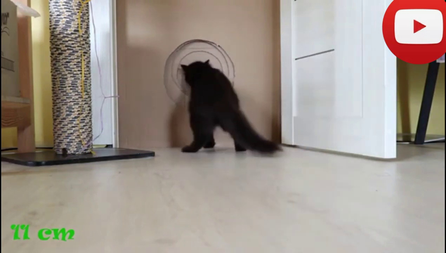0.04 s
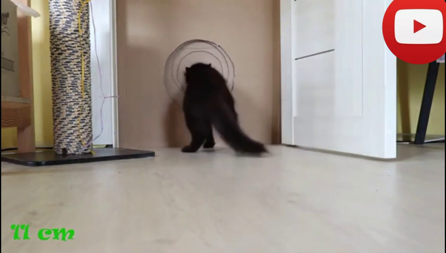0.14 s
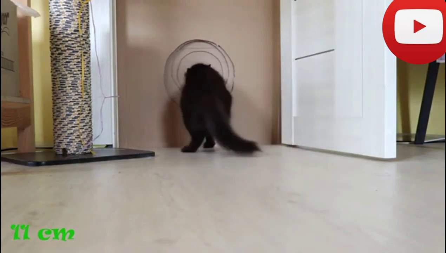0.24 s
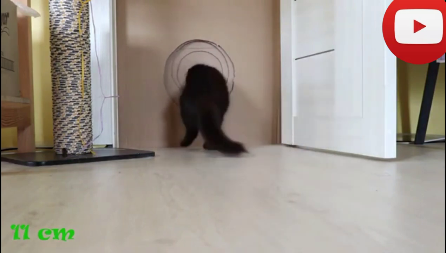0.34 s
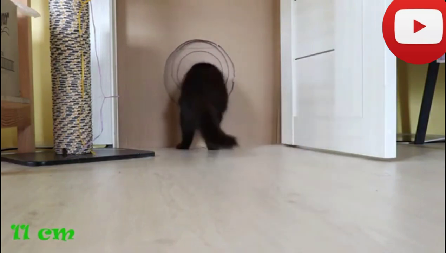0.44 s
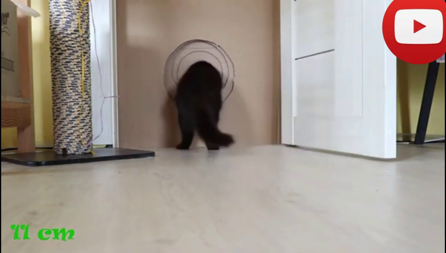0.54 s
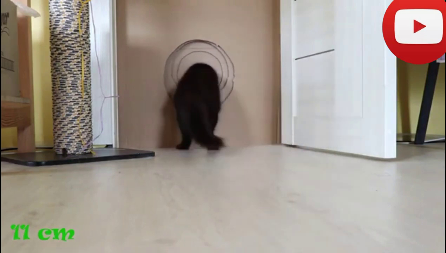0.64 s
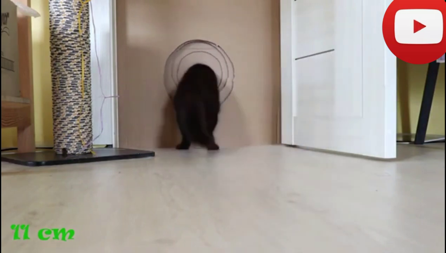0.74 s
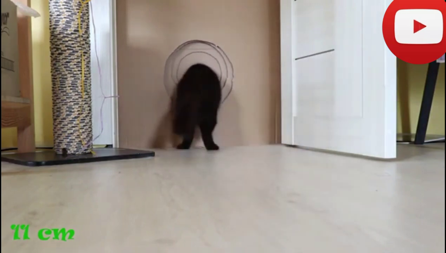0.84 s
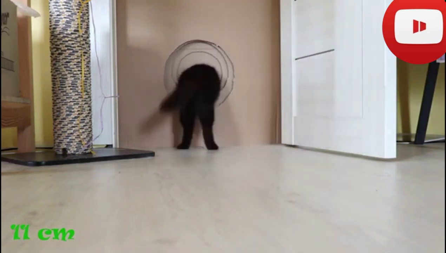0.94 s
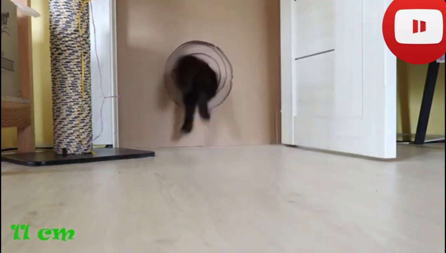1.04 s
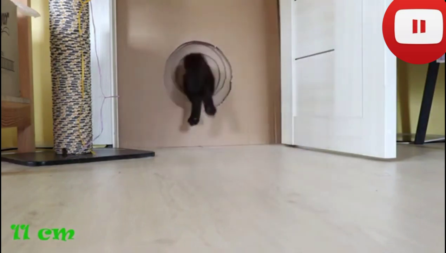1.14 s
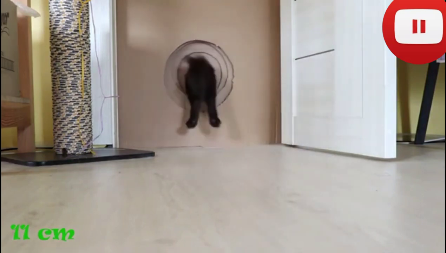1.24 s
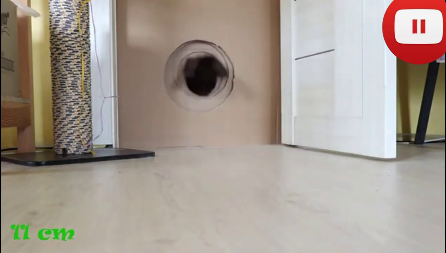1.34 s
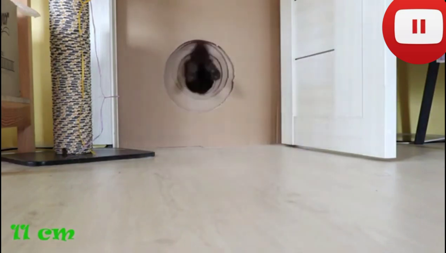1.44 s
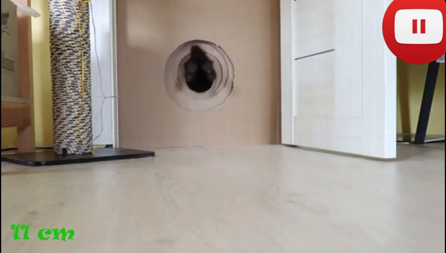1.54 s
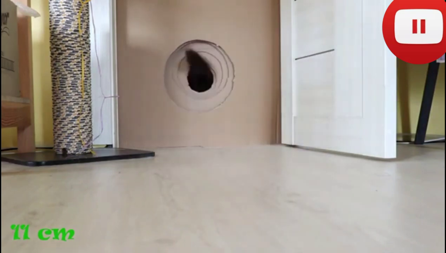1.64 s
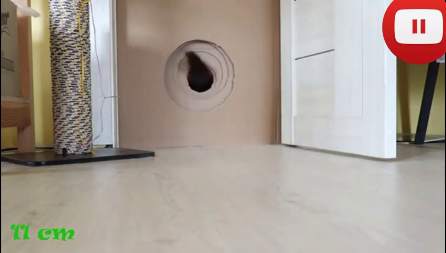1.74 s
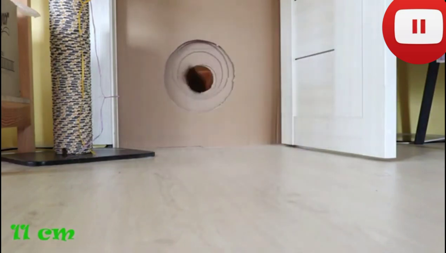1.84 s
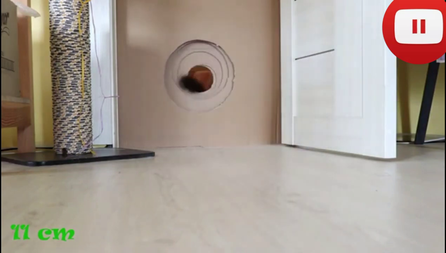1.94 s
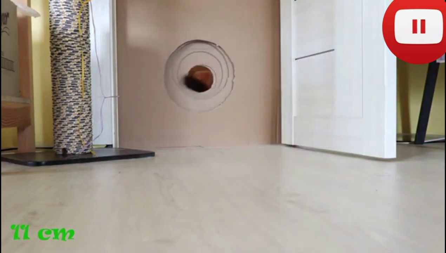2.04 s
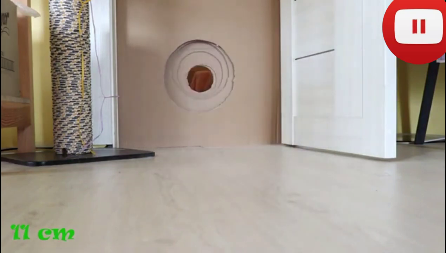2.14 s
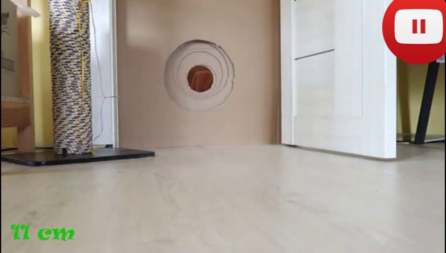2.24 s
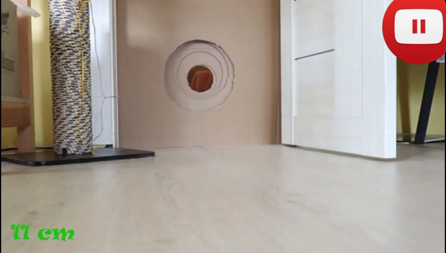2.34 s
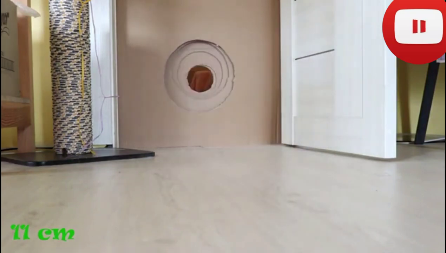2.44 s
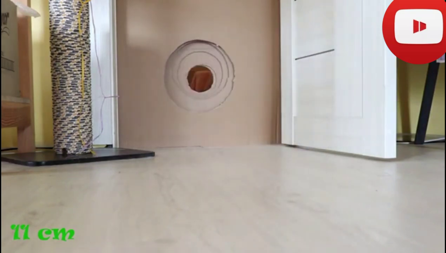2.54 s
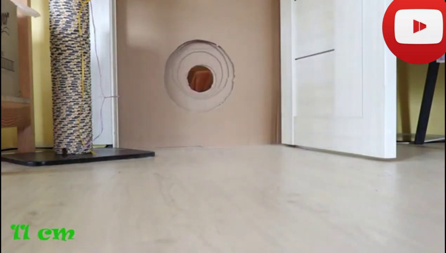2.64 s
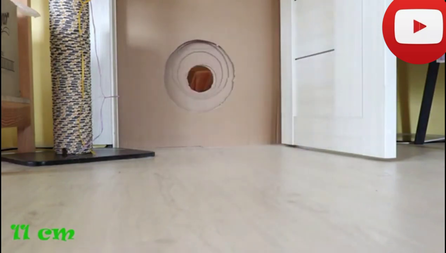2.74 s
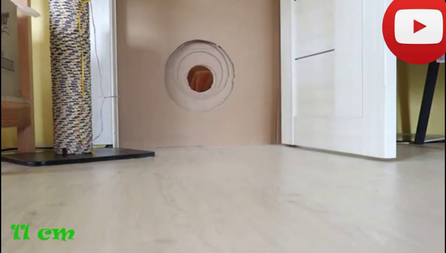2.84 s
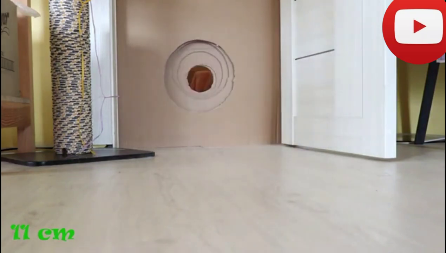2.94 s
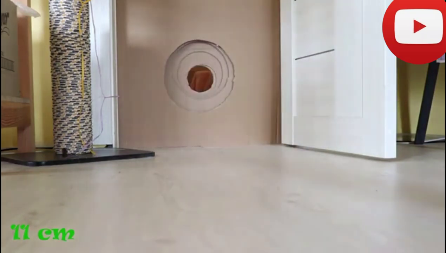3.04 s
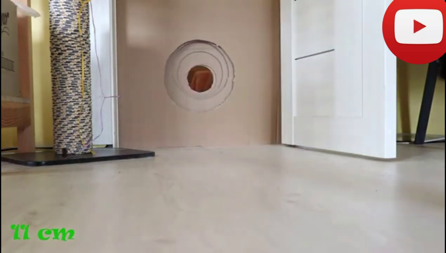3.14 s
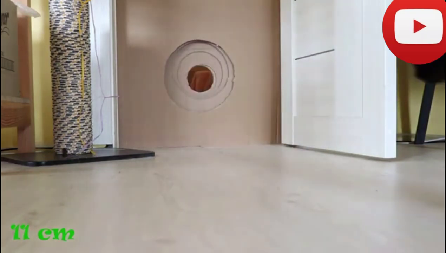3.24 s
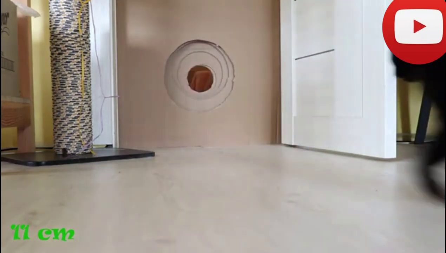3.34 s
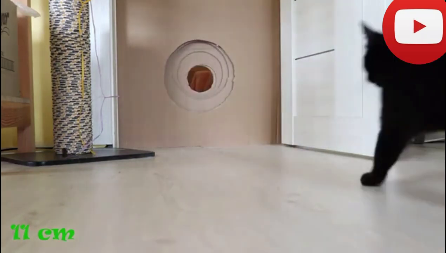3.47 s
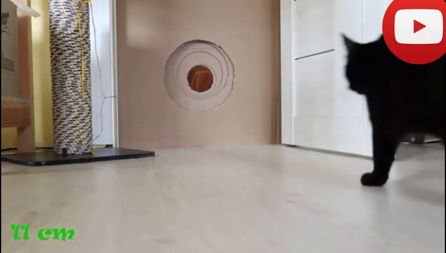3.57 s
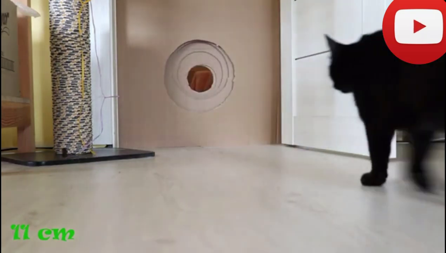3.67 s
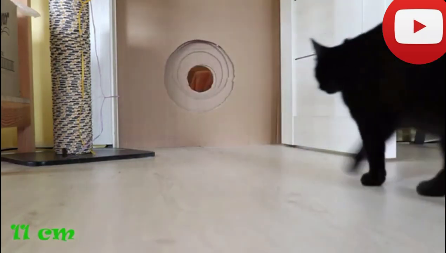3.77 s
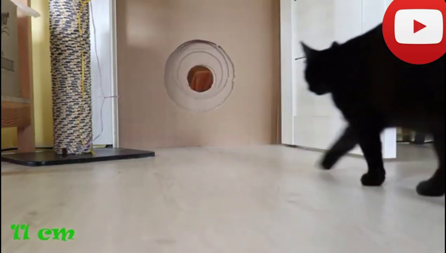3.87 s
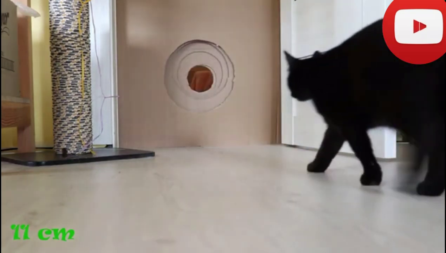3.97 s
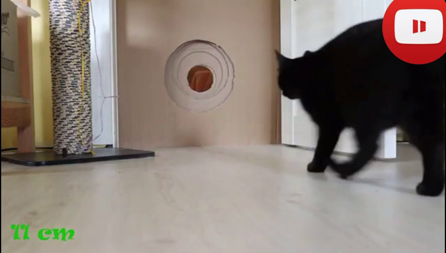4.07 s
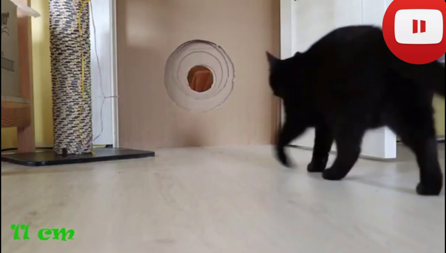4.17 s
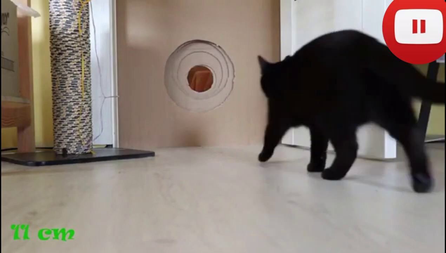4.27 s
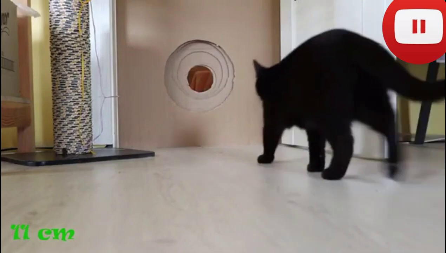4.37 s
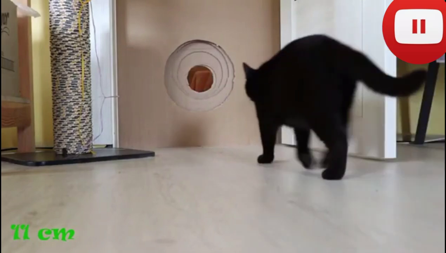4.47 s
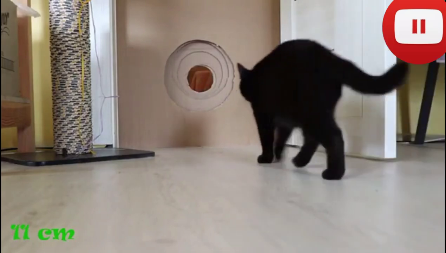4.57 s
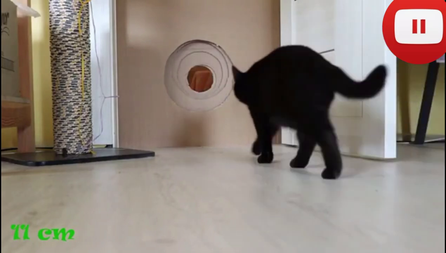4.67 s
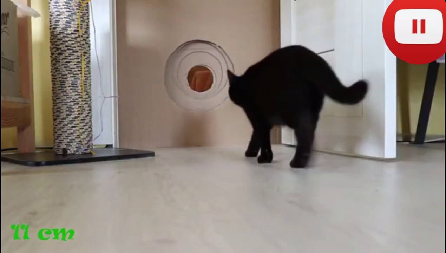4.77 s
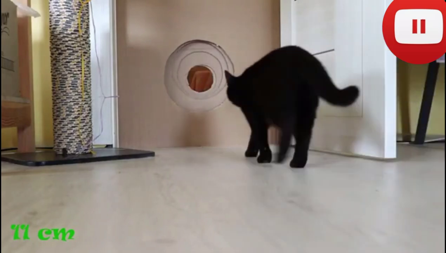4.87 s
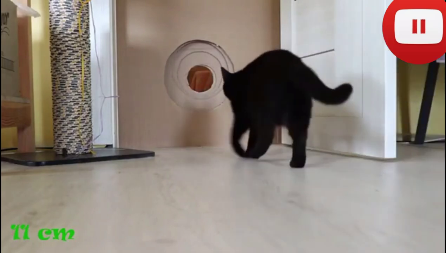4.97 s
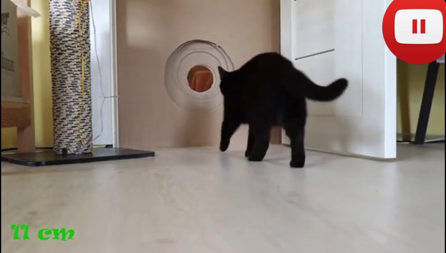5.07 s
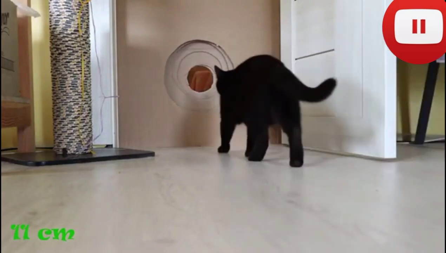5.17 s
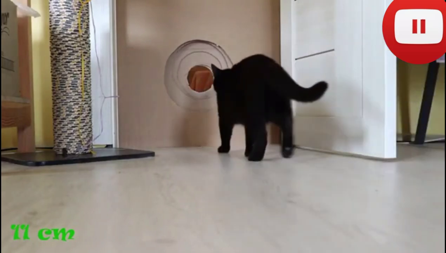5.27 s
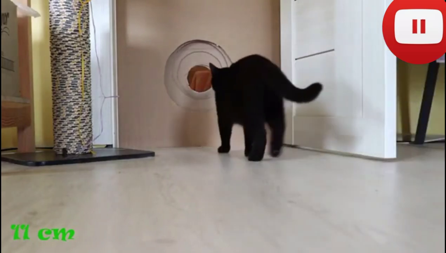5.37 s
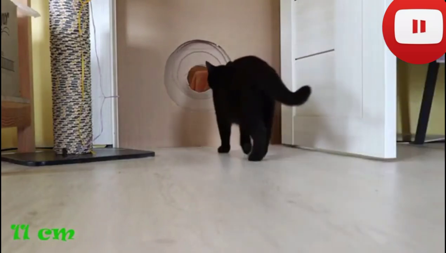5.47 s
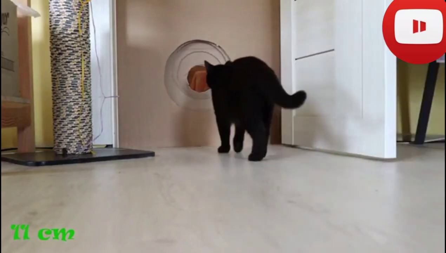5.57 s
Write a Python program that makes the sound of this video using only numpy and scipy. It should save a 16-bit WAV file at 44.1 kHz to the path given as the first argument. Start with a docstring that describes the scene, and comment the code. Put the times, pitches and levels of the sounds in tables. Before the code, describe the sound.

Faint fur brushes swell into a loud, thumping scrape against a cardboard sheet, followed by a cat's soft steps indoors.

```python
"""Faint brushes of fur over a low room rumble swell into rasps and thumps: a cat squeezes through a round
hole in a cardboard sheet set in a doorway, then pads back across a laminate floor with soft swishes.
Sliding friction on the rim makes the hiss, and stick-slip makes one creak. Knocks excite the sheet's
normal modes; shoves set off its slowest swing. A few tiny pings sound, and the hallway reverberates.
The loudest heaves overload a phone lying on the floor."""
import sys
import numpy as np
from scipy import signal
from scipy.fft import rfft, irfft
from scipy.io import wavfile
from scipy.ndimage import uniform_filter1d

SR = 44100
rng = np.random.default_rng(int(sys.argv[2]) if len(sys.argv) > 2 else 0)


def file_out(sig):
    """Save sig as 16-bit WAV at sys.argv[1]."""
    # one column per channel
    cols = np.atleast_2d(sig).T
    # limit, then scale
    lim = np.clip(cols, -1, 1)
    pcm = np.round(lim * 32767).astype(np.int16)
    wavfile.write(sys.argv[1], SR, pcm)


N = 247401
TIME = np.arange(N) / SR
HZ = np.maximum(np.arange(N // 2 + 1) * SR / N, 1)


def undb(db):
    """Amplitude ratio of a level in decibels."""
    return 10 ** (np.asarray(db) / 20)

def decay(t, t60):
    """Exponential damping: 60 dB down after t60 seconds."""
    return np.exp(-np.log(1000) * t / t60)

def along_hz(points):
    """Interpolation on a logarithmic frequency axis."""
    hz, value = np.transpose(points)
    return np.interp(np.log(HZ), np.log(hz), value)

def along_time(rows):
    """Interpolation of each level column in time; -120 dB outside the rows."""
    times, *columns = np.transpose(rows)
    return [np.interp(TIME, times, column, left=-120, right=-120) for column in columns]

def add(out, start_s, piece):
    """Superposition of a piece from start_s on."""
    i = int(start_s * SR)
    out[..., i:i + piece.shape[-1]] += piece[..., :N - i]

def band(x, lo_hz, hi_hz, order=2):
    """Band-pass filtering, scaled so that the mean of the channels has rms 1."""
    out = signal.sosfilt(signal.butter(order, [lo_hz, hi_hz], "band", fs=SR, output="sos"), x)
    return out / np.atleast_2d(out).mean(axis=0).std()

def flicker(rate_hz):
    """Random modulation: held values, smoothed twice, with a spread near 1."""
    hold = int(SR / rate_hz)
    steps = np.repeat(rng.standard_normal(N // hold + 1), hold)
    return 1.16 * uniform_filter1d(uniform_filter1d(steps, hold), hold)[:N]

def grains(scatter_db):
    """Heavy-tailed noise: many tiny slips and some strong ones."""
    return rng.standard_normal(N) * undb(scatter_db * rng.exponential(size=N))

# Left-right likeness of friction noise, high in the bass: frequency_hz, correlation
FRICTION_COHERENCE = [(50, 1), (300, 0.93), (700, 0.82), (1300, 0.67), (2600, 0.93), (4000, 0.34),
                      (6000, 0.16), (9000, 0.16), (14000, 0.065)]
def stereo_noise(spectrum, scatter_db, coherence=FRICTION_COHERENCE):
    """Partial coherence: shared and opposed grains add to coloured stereo noise of rms 1."""
    correlation = np.clip(along_hz(coherence), -1, 1)
    mid = rfft(grains(scatter_db)) * np.sqrt(1 + correlation)
    side = rfft(grains(scatter_db)) * np.sqrt(1 - correlation)
    out = irfft(undb(along_hz(spectrum)) * np.array([mid + side, mid - side]), N)
    return out / out.std()

# Spectrum of the room's background: frequency_hz, density_db
ROOM_SPECTRUM = [(12, -10), (20, -0.5), (40, -13.5), (100, -14), (160, -11.5), (200, -15.5), (370, -17),
                 (700, -26.5), (1300, -32.5), (2600, -39), (6000, -38), (8500, -40), (12000, -42.5),
                 (14500, -42), (15500, -51)]
# Its left-right likeness: frequency_hz, correlation
ROOM_COHERENCE = [(50, 0.33), (400, 0.78), (900, 0.55), (2500, 0.36), (5000, 0.61), (8000, .3),
                  (14000, .15)]
def room_tone(level_db=-48):
    """Ambient noise: a broadband floor, strongest in the bass, whose level drifts slightly."""
    return undb(level_db + 0.75 * flicker(4.3)) * stereo_noise(ROOM_SPECTRUM, .3, ROOM_COHERENCE)

def hallway(source, t60_s=0.63, level_db=-13.5):
    """Reverberation: convolution with a short dull wash, partly different in each channel."""
    t = TIME[:SR // 2]
    common, apart = band(rng.standard_normal((2, len(t))), 90, 8200) * decay(t, t60_s) * (t > .004)
    response = np.array([common + 0.24 * apart, common - 0.49 * apart]) / np.sqrt((common ** 2).sum())
    return undb(level_db) * signal.fftconvolve(source[None], response, axes=1)[:, :N]

# Tiny pings: centre_s, pitch_hz, peak_db, length_s
PINGS = [(.041, 1480, -39.5, 0.0066), (0.274, 8300, -45, 0.022), (0.844, 1417, -53, 0.033),
         (2.416, 1410, -52, 0.017), (2.474, 1384, -46, 0.012), (2.632, 1305, -51, 0.017)]
def pings():
    """Tone bursts: a Gaussian envelope gives each pure blip soft edges."""
    out = np.zeros(N)
    for centre_s, pitch_hz, peak_db, length_s in PINGS:
        envelope = undb(peak_db) * np.exp(-(2 * (TIME - centre_s) / length_s) ** 2)
        out += envelope * np.sin(2 * np.pi * pitch_hz * TIME)
    return out

def tufts(noise, depth_db):
    """Independent modulation: tufts catch at different moments, so each third-octave flickers alone."""
    out = 0
    for hz in 1100 * 2 ** np.arange(0, 4, 1 / 3):
        third = signal.butter(1, [hz, hz * 2 ** (1 / 3)], "band", fs=SR, output="sos")
        out = out + signal.sosfilt(third, noise) * undb(depth_db * flicker(35))
    return out

# Spectrum of the board shaken by rubbing: frequency_hz, density_db
BOARD_SPECTRUM = [(47, -36), (80, -5.5), (151, -2.5), (310, -8.5), (396, -4.5), (464, -7.5), (627, -9.5),
                  (735, -8.5), (2500, -20), (3250, -43), (5500, -120)]
def rubbing(spectrum, hiss_db, board_db, air_db, scatter_db, judder_db):
    """Sliding friction: slips of hair make hiss, an airy top and dull board noise that judder together."""
    hair = tufts(stereo_noise(spectrum, scatter_db), 2 * judder_db)
    hiss = band(hair, 1500, 8200, order=1)
    air = band(hair, 6460, 17000) * undb(air_db)
    board = stereo_noise(BOARD_SPECTRUM, 1.9) * undb(board_db + judder_db * flicker(30))
    return undb(hiss_db + judder_db * flicker(110)) * (hiss + air + board)

def strokes(rows):
    """Exponential envelopes, 20 dB per rise or fade time; the loudest stroke sets level and colour."""
    peak_s, hiss_db, rise_s, fade_s, *colours = np.transpose(rows)[:, :, None]
    envelopes_db = hiss_db - 20 * np.maximum((peak_s - TIME) / rise_s, (TIME - peak_s) / fade_s)
    loudest = envelopes_db.argmax(axis=0)
    return [envelopes_db.max(axis=0)] + [uniform_filter1d(db[loudest, 0], SR // 50) for db in colours]

# Spectrum of paw friction: frequency_hz, density_db
PAW_SPECTRUM = [(880, -1), (1500, -5), (3330, -3), (4680, -3.5), (8630, -6.5), (13000, -13.5), (15300, -19)]
# Swishes of the walk: peak_s, hiss_db, rise_s, fade_s, board_share_db, air_share_db
SWISHES = [(3.41, -52, 0.33, 0.18, -2, -8), (3.63, -54.5, 0.044, 0.34, -19, 0.5),
           (3.71, -48.5, .15, 0.19, -16, -6.5), (3.91, -51.5, 0.096, 0.42, -4.5, -10),
           (4.05, -57, 0.26, .15, 0, -4), (4.55, -46.5, 0.12, 0.26, -4, -6),
           (4.66, -50, 0.079, 0.4, 6, -13), (5.05, -59, .12, 0.23, -8, -4), (5.19, -57, 0.033, .2, 5, -8),
           (5.31, -45, 0.045, 0.46, -2.5, -7), (5.38, -49, .1, 0.31, 6.5, -6), (5.6, -54, 0.24, .2, -2, -6)]
def paw_swishes():
    """Light friction: soft, fine-grained strokes as the cat walks."""
    return rubbing(PAW_SPECTRUM, *strokes(SWISHES), scatter_db=0.4, judder_db=1.4)

# Envelope of the creak: time_s, level_db
CREAK_LEVELS = [(1.345, -32), (1.36, -8.5), (1.37, -16.5), (1.376, -1), (1.397, 3.5), (1.403, -10.5),
                (1.415, -6.5), (1.44, -19.5), (1.5, -28)]
def creak(pitch_hz=412.6):
    """Stick-slip oscillation: the rim drives one mode of the sheet, wavering, with grit at each slip."""
    level_db, = along_time(CREAK_LEVELS)
    phase = 2 * np.pi * np.cumsum(pitch_hz * (1 + 0.0099 * flicker(150))) / SR
    tone = np.sin(phase) + 0.11 * np.sin(2 * phase)
    grit = 0.11 * band(rng.standard_normal(N), 220, 1100) * (1 + np.sin(phase))
    return undb(level_db + 0.86 * flicker(120)) * (tone + grit)

# Spectrum of fur on cardboard: frequency_hz, density_db
FUR_SPECTRUM = [(710, -29.5), (1200, 0), (1760, -4.5), (1860, -8), (2070, -4.5), (2250, -6), (3000, -3),
                (4900, -5), (8340, -4.5), (10700, -8.5), (11900, -6), (13600, -11), (15300, -19)]
# The body drags through the rim: time_s, hiss_db
DRAG_LEVELS = [(.8, -55), (.865, -42), (.97, -43), (1.04, -50), (1.085, -40.5), (1.29, -33.5),
               (1.385, -24.5), (1.42, -34), (1.46, -30.5), (1.52, -22), (1.53, -10.5), (1.548, -8),
               (1.558, -23.5), (1.578, -9.5), (1.6, -13.5), (1.615, -10.5), (1.64, -12), (1.71, -16),
               (1.78, -26.5), (1.8, -45), (1.82, -33), (1.875, -24), (1.94, -38.5), (2.02, -35),
               (2.07, -42), (2.2, -39), (2.26, -46.5), (2.34, -62)]
# Colour of the drag relative to its hiss: time_s, board_share_db, air_share_db
DRAG_COLOUR = [(.8, -2, 0.5), (.97, -7.5, -5.5), (1.1, 1.5, -4), (1.2, -2, 0), (1.27, 0.5, -2),
               (1.39, 9, 0), (1.5, -1.5, -3), (1.56, 4, -3), (1.65, 2, -8), (1.8, 6.5, -7.5),
               (1.95, 0.5, -1.5), (2.15, 0.5, -2.5), (2.34, 6.5, -6)]
# Head and tail brush the rim: peak_s, hiss_db, rise_s, fade_s, board_share_db, air_share_db
BRUSHES = [(.14, -50, 0.15, 0.39, -7.5, -7), (.27, -44.5, 0.1, 0.29, -4.5, -3),
           (.33, -44, .1, 0.21, -3, -5), (.415, -43.5, 0.062, 0.11, 9.5, -7.5),
           (.6, -54, 0.26, 0.41, 0.5, -2), (.72, -48, 0.2, .15, -4, -1),
           (2.405, -46.5, 0.12, .25, -11, -2.5), (2.48, -48, .15, 0.13, -3.5, 2),
           (2.63, -47.5, 0.11, 0.074, -17.5, 0.5)]
def fur_on_rim():
    """Coarse friction: the long drag or a light brush, whichever is louder, sets level and colour."""
    drag = along_time(DRAG_LEVELS) + along_time(DRAG_COLOUR)
    brush = strokes(BRUSHES)
    hiss_db, board_db, air_db = np.where(drag[0] > brush[0], drag, brush)
    return rubbing(FUR_SPECTRUM, hiss_db, board_db, air_db, scatter_db=2.0, judder_db=1.42)

# Claws and sudden slips of fur: start_s, level_db
SCRAPES = [(0.326, -32), (0.4069, -41), (1.085, -32), (1.199, -26), (1.246, -31), (1.5254, -0.5),
           (1.5688, 0.5), (1.6078, 7.5), (1.8134, -13), (1.9816, -21.5), (1.991, -26), (2.1775, -31),
           (5.183, -46), (5.2987, -46)]
def scrapes(catch_t60_s=0.0053, burst_t60_s=0.068):
    """Friction transients: a sharp catch, then a burst of coarse grains."""
    envelope, t = np.zeros(N), TIME[:SR // 2]
    shape = 0.77 * decay(t, catch_t60_s) + 0.38 * decay(t, burst_t60_s)
    for start_s, level_db in SCRAPES:
        add(envelope, start_s, undb(level_db) * shape)
    return envelope * stereo_noise(FUR_SPECTRUM, scatter_db=2.7)

# Normal modes of the sheet: frequency_hz, level_db, t60_s
SHEET_MODES = [(70.5, -13.5, 0.5), (132.3, -6.5, 0.3), (167.7, 3.5, 0.22), (226.8, -8.5, 0.23),
               (255.2, -5, 0.19), (303.4, 1, 0.13), (344.6, -13.5, 0.15), (423.6, -1.5, 0.1),
               (559, -4.5, 0.061), (658, -4.5, 0.24), (762, -22, 0.13), (890, -10.5, 0.094),
               (1040, -10.5, 0.12), (1330, -16.5, 0.12), (1590, -20, .08)]
# Paws and elbows on the sheet and floor: start_s, peak_db, contact_ms, t60_ratio
KNOCKS = [(0.362, -24.5, 0.57, 0.65), (0.408, -35, 1.2, 0.8), (0.423, -2, 1.29, 0.84),
          (1.105, -23.5, 0.98, 1), (1.291, -22.5, 3, 0.67), (1.526, -7.5, 0.44, 0.76),
          (1.577, 4, 1.6, 0.61), (1.6, -3, 1.3, 0.64), (1.825, 5.5, 2.23, 0.37), (1.914, -7.5, 0.91, 0.5),
          (2.197, -17, 2.8, 0.63), (2.247, -5.5, 2.55, 0.7), (3.089, -33.5, 1.4, 0.39),
          (4.627, -27, 0.47, 0.97), (4.654, -32.5, 0.93, 0.78), (5.182, -39, 0.82, 0.8),
          (5.372, -34, 0.68, 0.62)]
def knocks():
    """Impact excitation: a smooth pulse drives the modes and a loose rattle; longer contact is duller."""
    out, t = np.zeros(N), TIME[:SR // 2]
    mode_hz, mode_db, t60_s = np.transpose(SHEET_MODES)[:, :, None]
    scatter = rng.standard_normal((len(KNOCKS), 2, len(SHEET_MODES), 1))
    for (start_s, peak_db, contact_ms, t60_ratio), (weight, detune) in zip(KNOCKS, scatter):
        envelopes = undb(mode_db + 4.15 * weight) * decay(t, t60_ratio * t60_s)
        ring = (envelopes * np.sin(2 * np.pi * mode_hz * (1 + 0.017 * detune) * t)).sum(axis=0)
        rattle = undb(-2.5) * band(rng.standard_normal(len(t)), 120, 710) * decay(t, t60_ratio * 0.26)
        force = np.hanning(int(contact_ms * SR / 1000) + 2)
        blow = signal.fftconvolve(ring + rattle, force)[:len(t)]
        add(out, start_s, undb(peak_db) * blow / np.abs(blow).max())
    return out

# Envelope of the sheet's slow wobble: time_s, level_db
WOBBLE_LEVELS = [(0, -58), (.2, -51), (.45, -35), (.65, -37), (.75, -44), (.95, -33), (1.2, -35.5),
                 (1.32, -22), (1.55, -18.5), (1.8, -15), (2.0, -29), (2.3, -25.5), (2.5, -34), (2.65, -52),
                 (2.9, -56)]
def wobble():
    """Random vibration: the swaying sheet radiates a deep rumble, nearly alike in both channels."""
    level_db, = along_time(WOBBLE_LEVELS)
    mid = band(rng.standard_normal(N), 18, 52)
    side = band(rng.standard_normal(N), 22, 130)
    return undb(level_db + 2.5 * flicker(12)) * np.array([mid + 0.18 * side, mid - 0.23 * side])

# Swings of the whole sheet: start_s, level_db, direction (+1 out, -1 in), frequency_hz, t60_s
HEAVES = [(0.262, -25.5, 1, 29, 0.62), (0.353, -2.5, -1, 34, 0.1), (0.403, -7.5, -1, 63.6, 0.43),
          (0.438, -6.5, -1, 32.6, 0.313), (1.111, -22, 1, 20, 0.99), (1.324, -6.5, -1, 25, 0.41),
          (1.491, 1, 1, 13, 0.15), (1.545, 9.5, -1, 15.2, 0.18), (1.572, 1.5, 1, 44.5, 0.25),
          (1.654, -4, -1, 32, 0.16), (1.741, 12.5, 1, 15, 0.069), (1.783, 13.5, 1, 33.8, 0.18),
          (1.85, -9, -1, 20.4, 0.6), (1.904, 5, 1, 24.7, 0.14), (2.09, 0.5, 1, 35, 0.43),
          (2.231, 1.5, 1, 38.5, 0.24), (2.299, -5, 1, 34.5, 0.35), (2.741, -26, 1, 6.3, 0.55),
          (4.584, -33, 1, 24, 0.33), (4.75, -29.5, 1, 16, 0.28)]
def heaves(onset_s=0.075):
    """Damped free vibration: each shove sets off the sheet's slowest swing."""
    out, t = np.zeros(N), TIME[:SR // 2]
    for start_s, level_db, direction, frequency_hz, t60_s in HEAVES:
        envelope = undb(level_db) * (1 - decay(t, onset_s)) * decay(t, t60_s)
        add(out, start_s, direction * envelope * np.sin(2 * np.pi * frequency_hz * t))
    return out

def scene():
    """Superposition of all sources; knocks, pings, rubbing and scrapes also reverberate."""
    swings = (wobble() + heaves()) * undb([[-1.5], [.7]])  # left and right gains
    struck = pings() + knocks()
    room = room_tone()
    rubbed = fur_on_rim() + paw_swishes() + scrapes()
    creaked = creak() * undb([[-.8], [.8]])
    reverberation = hallway(struck + .8 * rubbed.mean(axis=0))
    return room + reverberation + creaked + rubbed + struck + swings

def record(dry, cutoff_hz=15400):
    """Saturation: the phone's input stage flattens at full scale, then a low-pass cuts the top."""
    clipped = dry / (1 + np.abs(dry) ** 12) ** (1 / 12)
    low_pass = signal.ellip(8, .2, 60, cutoff_hz, fs=SR, output="sos")
    return np.clip(signal.sosfilt(low_pass, clipped), -1, 1)


dry = scene()
out = record(dry)
file_out(out)
```